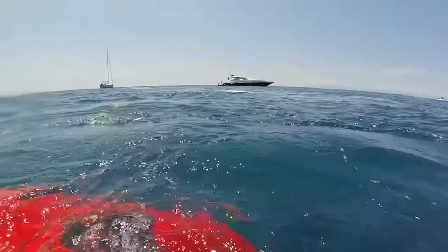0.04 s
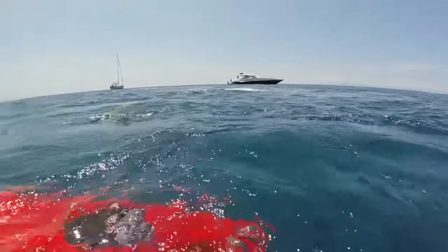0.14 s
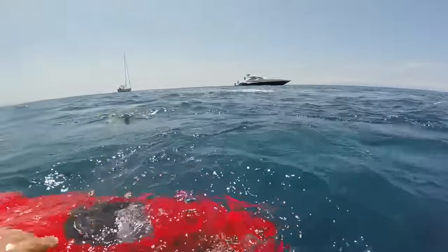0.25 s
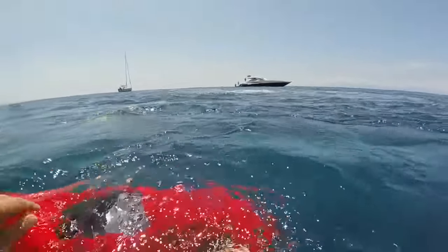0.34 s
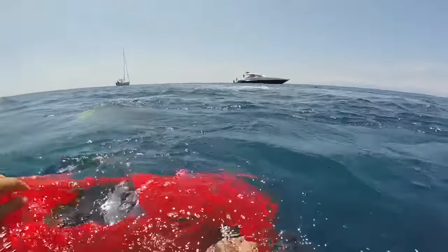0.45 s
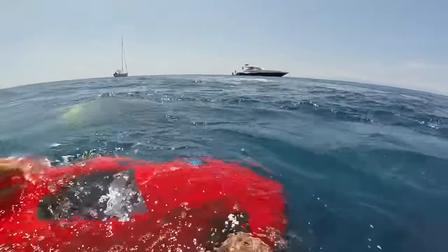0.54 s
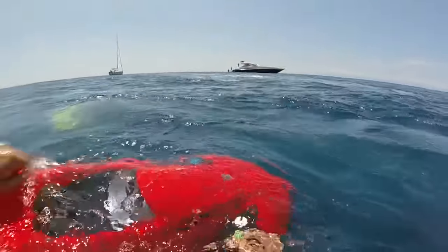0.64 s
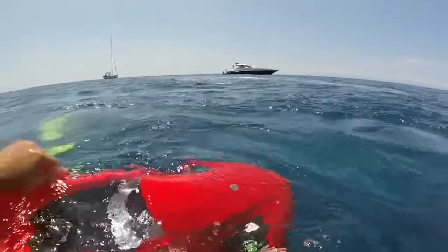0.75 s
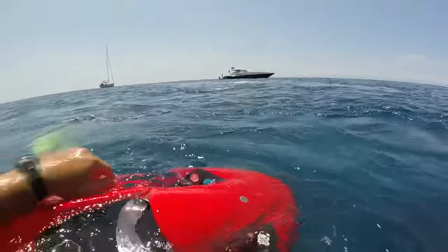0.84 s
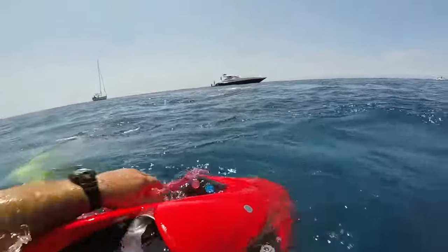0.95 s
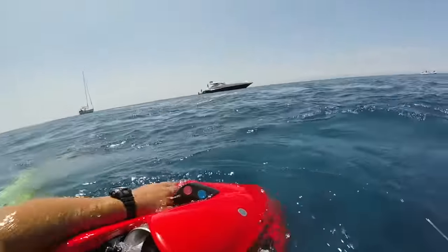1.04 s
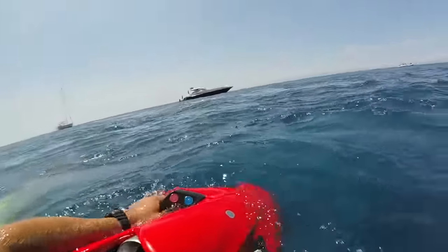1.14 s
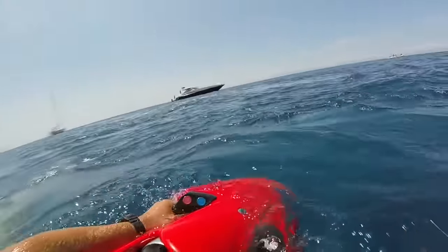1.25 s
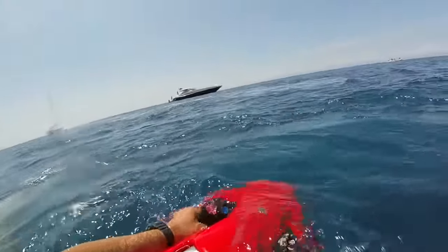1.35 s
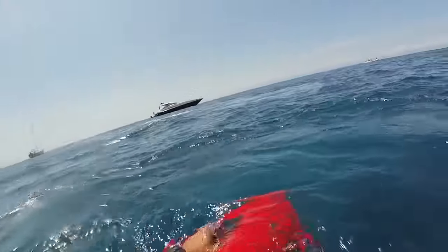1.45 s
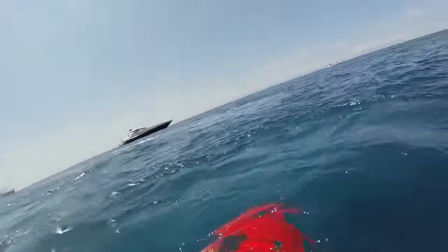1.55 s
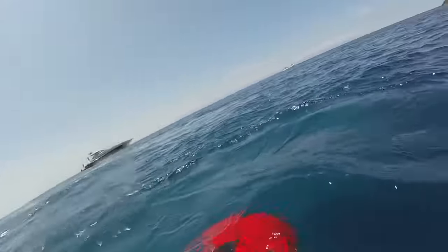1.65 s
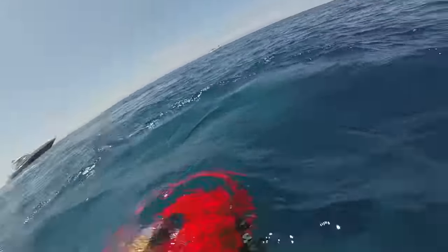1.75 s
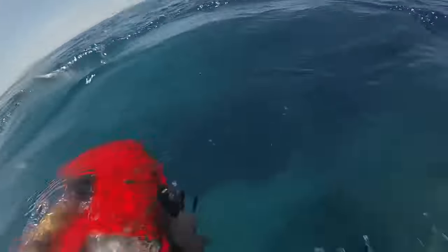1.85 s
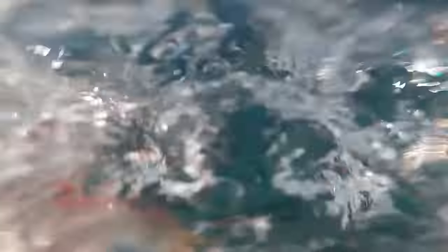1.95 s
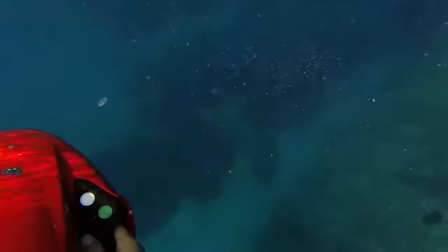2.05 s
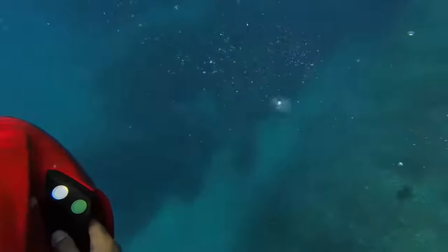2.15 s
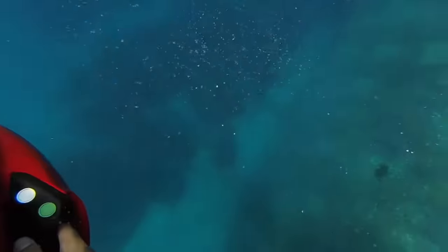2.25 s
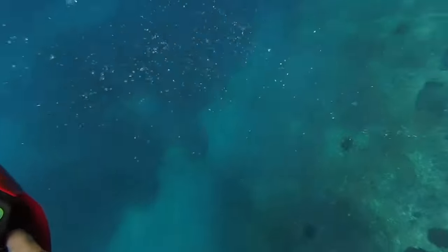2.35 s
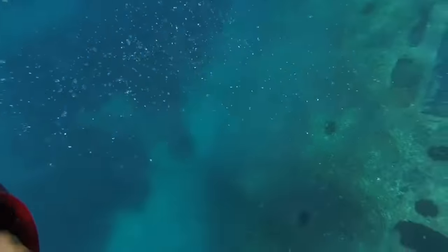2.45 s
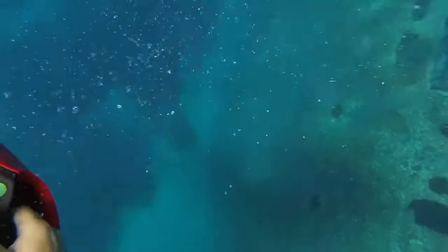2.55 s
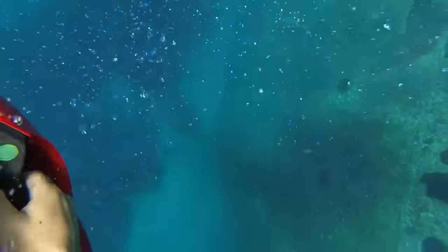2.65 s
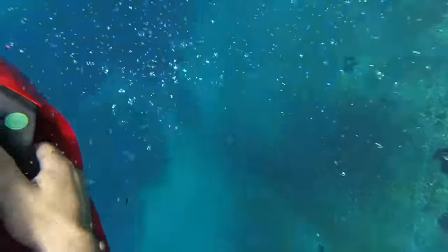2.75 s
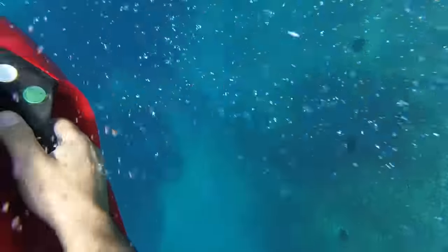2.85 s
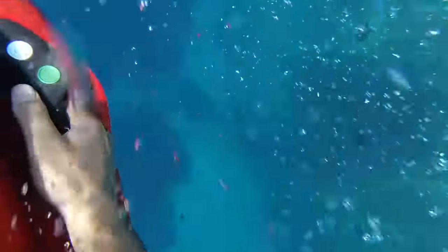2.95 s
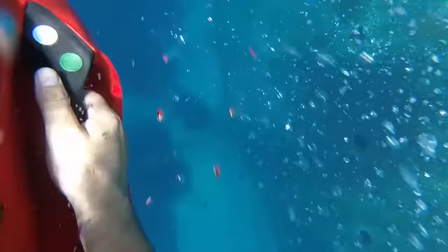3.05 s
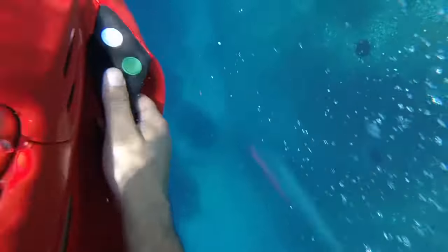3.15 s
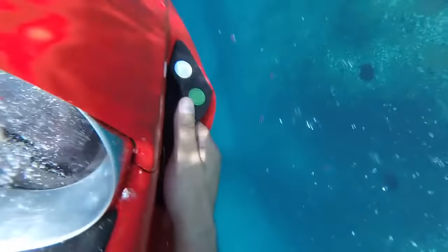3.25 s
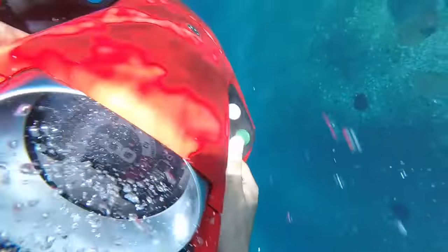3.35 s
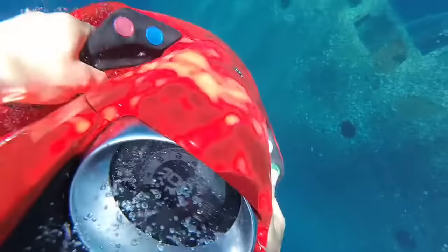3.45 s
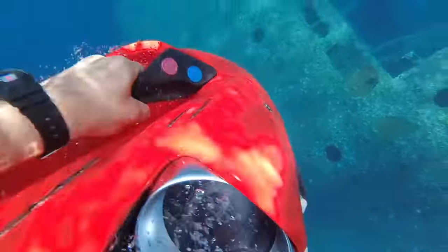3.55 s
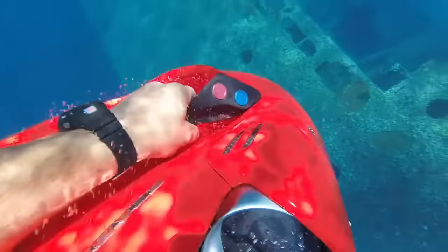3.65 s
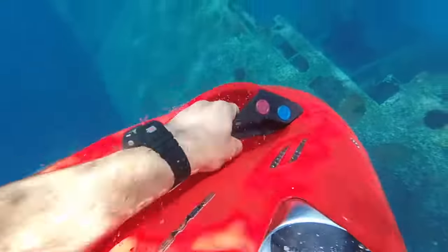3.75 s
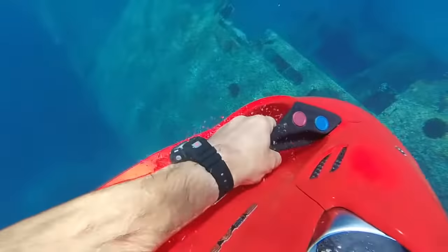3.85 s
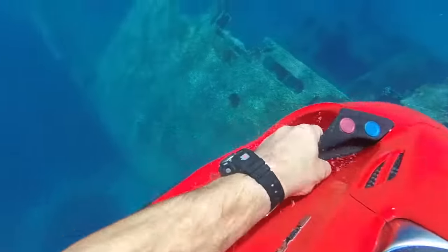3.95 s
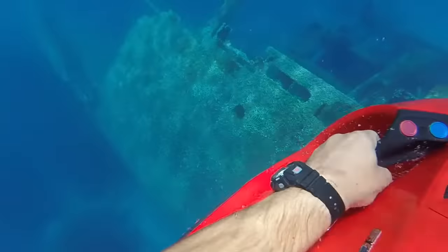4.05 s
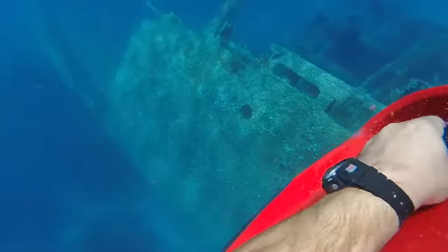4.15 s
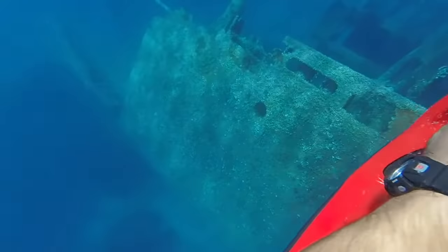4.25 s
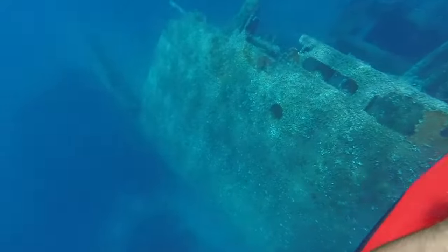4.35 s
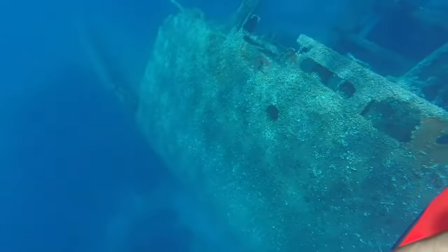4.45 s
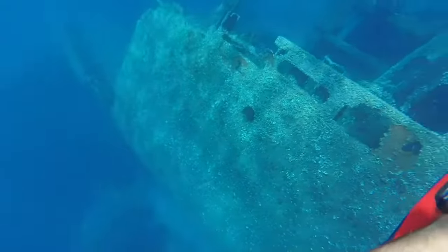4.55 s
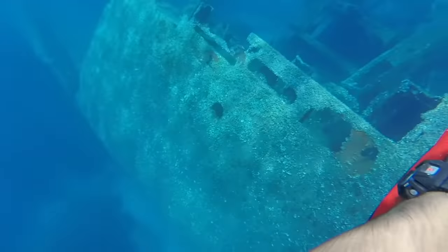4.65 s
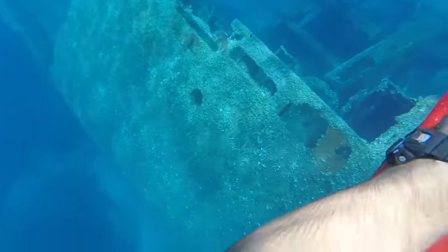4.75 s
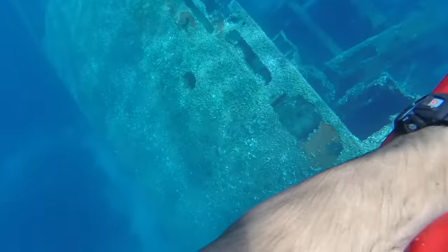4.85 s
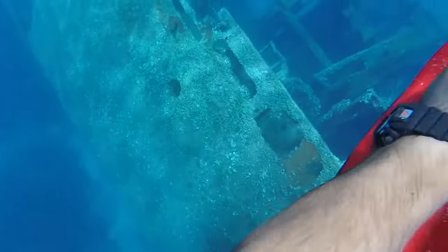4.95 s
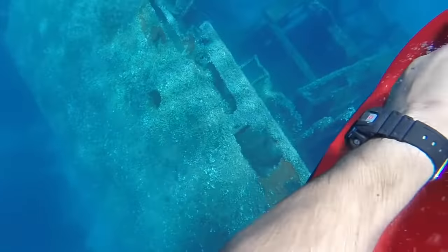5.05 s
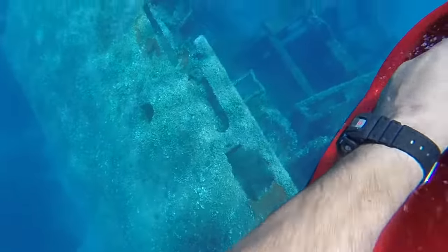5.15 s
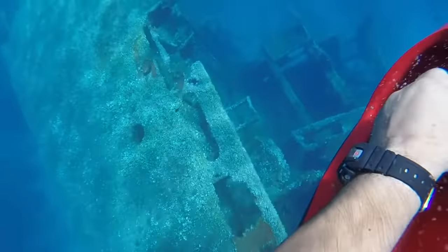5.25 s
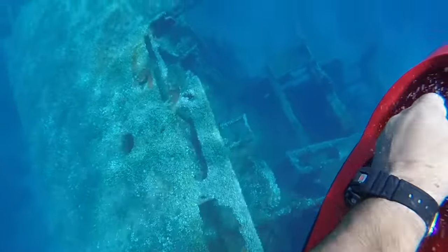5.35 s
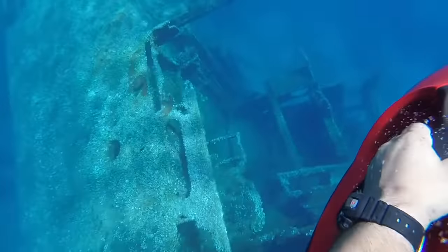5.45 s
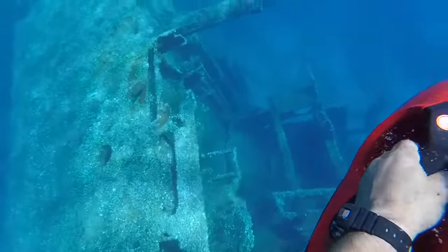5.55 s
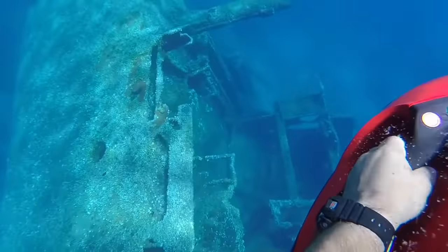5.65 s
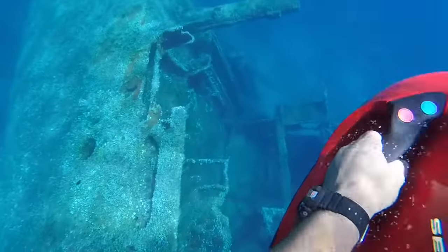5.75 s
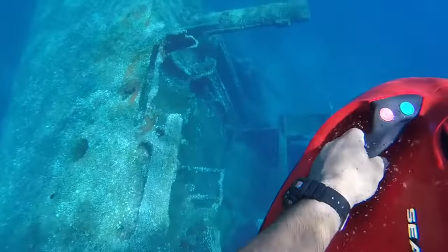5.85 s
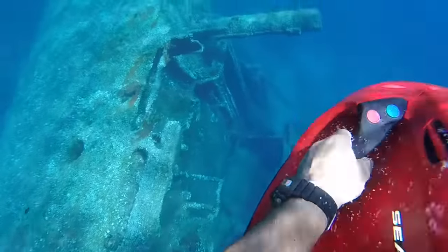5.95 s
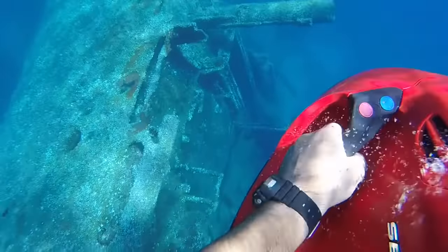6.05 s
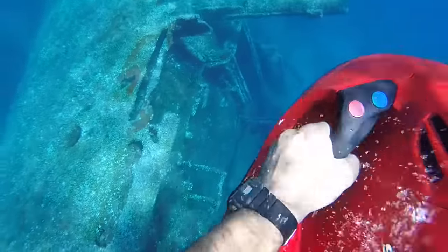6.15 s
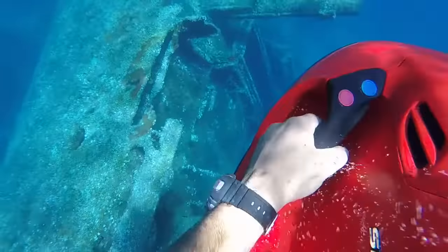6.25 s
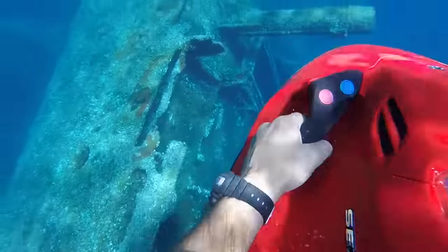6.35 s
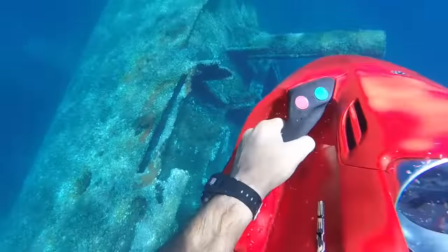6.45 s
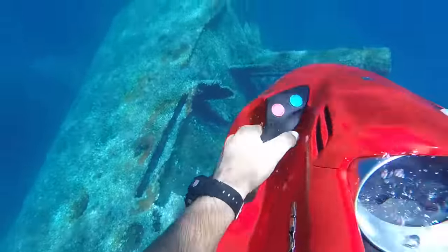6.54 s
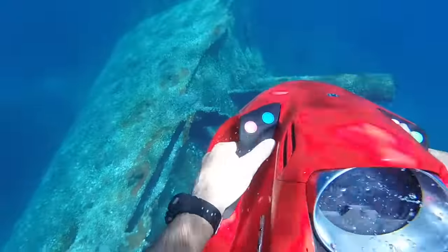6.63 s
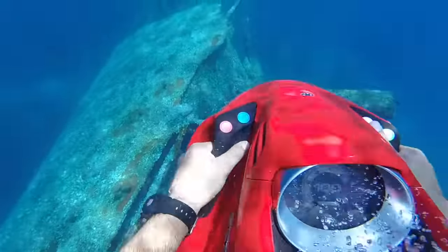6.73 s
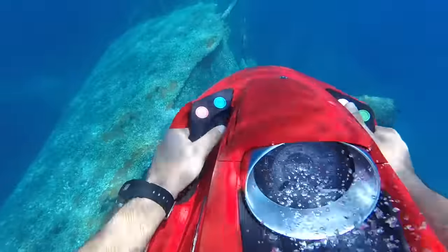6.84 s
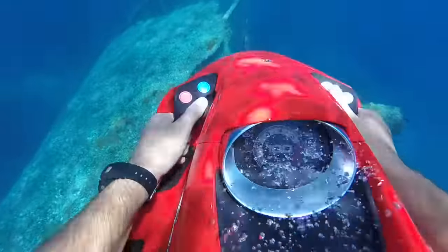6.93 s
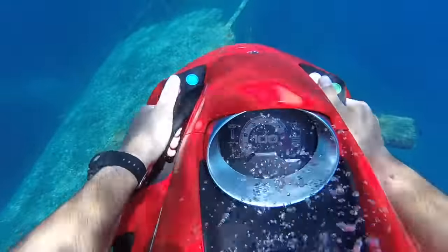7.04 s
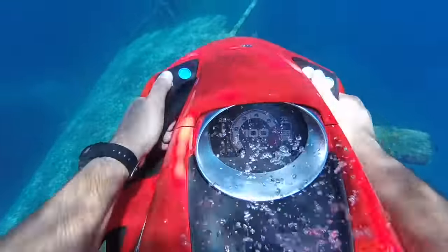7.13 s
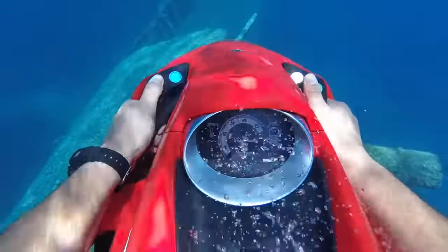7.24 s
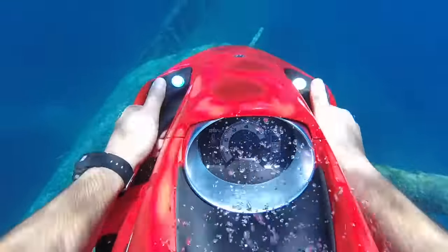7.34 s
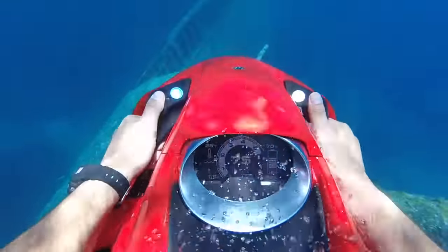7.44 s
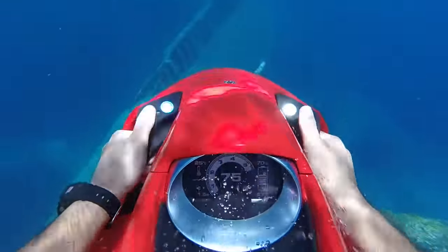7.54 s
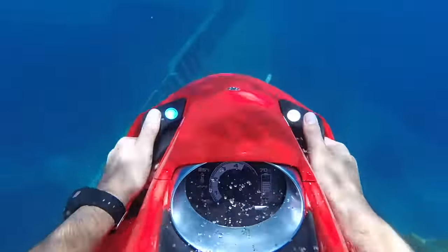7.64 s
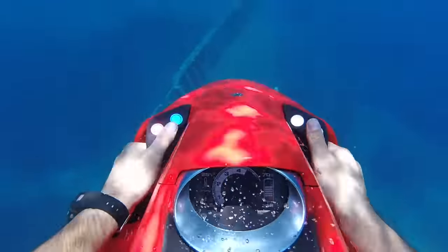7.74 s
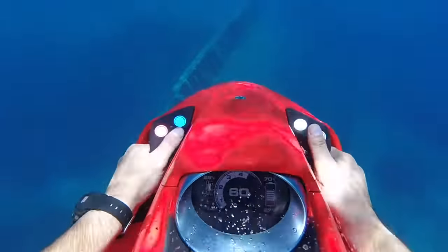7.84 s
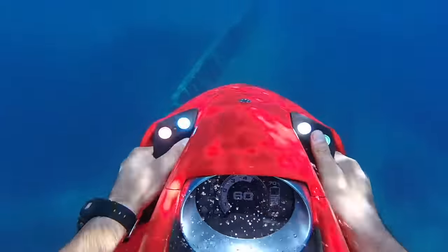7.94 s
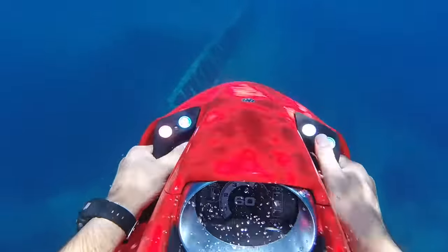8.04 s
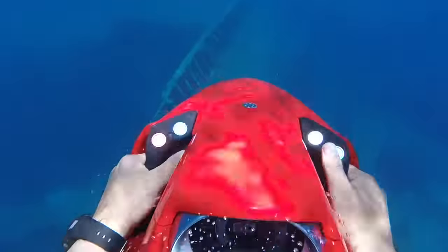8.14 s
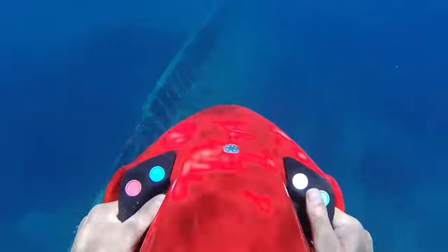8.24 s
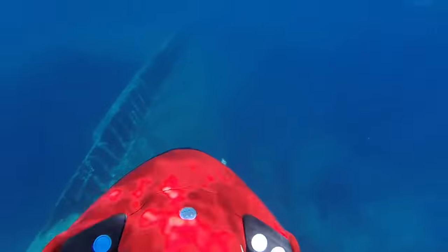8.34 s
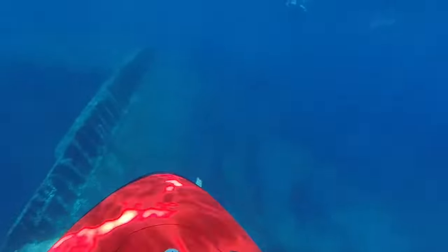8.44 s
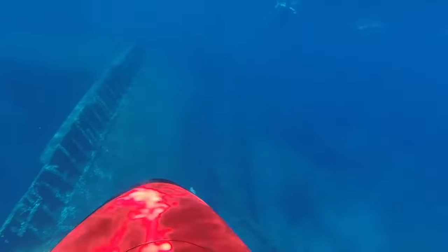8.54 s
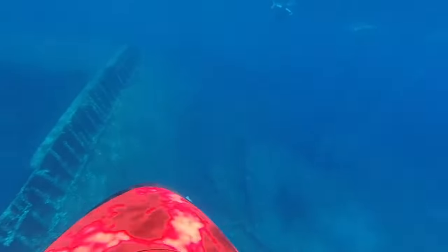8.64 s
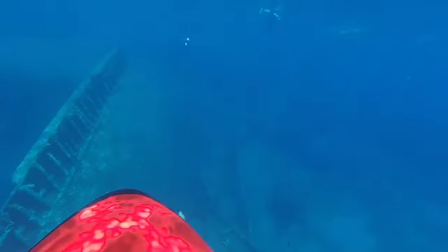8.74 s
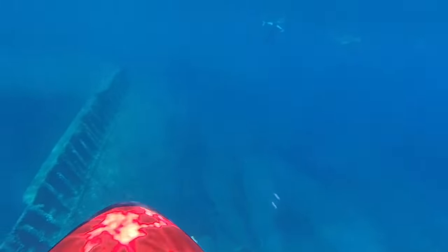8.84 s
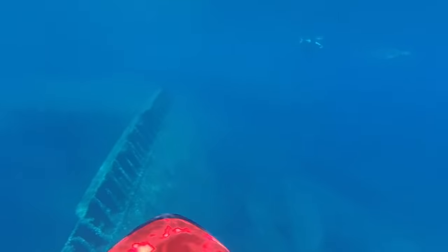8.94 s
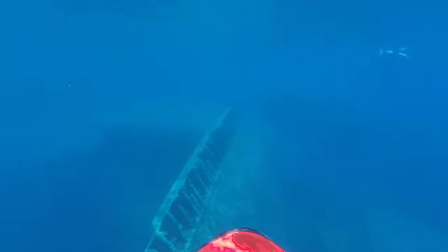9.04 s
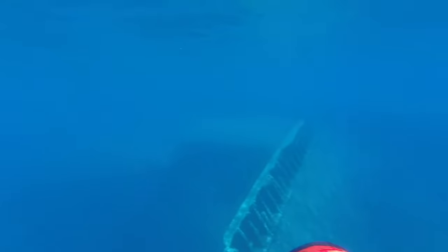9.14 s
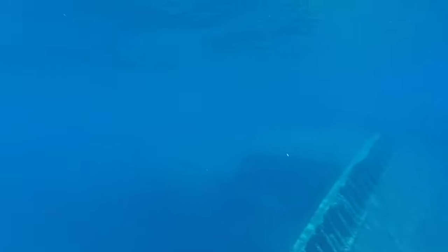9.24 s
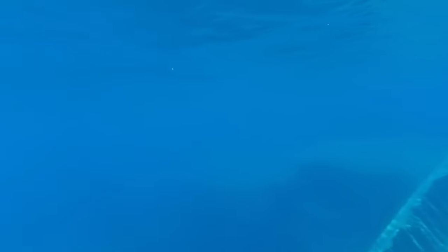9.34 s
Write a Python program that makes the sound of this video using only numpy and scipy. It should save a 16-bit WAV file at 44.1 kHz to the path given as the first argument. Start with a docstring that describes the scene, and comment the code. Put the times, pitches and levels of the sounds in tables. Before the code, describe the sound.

An underwater scooter dives from splashing surface into dull, close underwater sound: low motor hum and whine, bubbling surges, thumps, a slowdown and restart.

```python
"""At a choppy sea surface and then below it, an electric underwater scooter dives with a camera in a housing.
Spray, made of random impulses and ringing bubbles, fizzes until water closes over the microphone with a gulp.
Below, the three-bladed impeller hums as a blade tone with overtones of its shaft rate. Eddies, as filtered
impulses, buffet the housing, and bubbles rush, ring and tick past it as noise and decaying sines."""
import sys
import numpy as np
from scipy import signal
from scipy.fft import rfft, irfft, next_fast_len
from scipy.io import wavfile

SR = 44100
rng = np.random.default_rng(int(sys.argv[2]) if len(sys.argv) > 2 else 0)


def master_out(mix):
    """Clip the mix to full scale and print it as 16-bit PCM to the path in sys.argv[1]."""
    frames = np.transpose(np.atleast_2d(mix))
    ceiling = np.clip(frames, -1, 1)
    pcm = np.round(ceiling * 32767).astype(np.int16)
    wavfile.write(sys.argv[1], SR, pcm)


N = 414099
TIME = np.arange(N) / SR
EVENT_TIME = np.arange(SR * 3 // 4) / SR

# Impeller speed. Each row: time in seconds, mean blade-pass frequency in Hz.
SPEED = [(0, 71.5), (1.3, 92.6), (1.8, 111.2), (2.3, 118.4), (2.7, 120.1), (4.2, 120.4), (5.55, 121.7),
         (6.3, 101.6), (6.55, 104.6), (7.05, 110.4), (7.3, 108.6), (7.6, 99.5), (8.0, 99.75), (8.3, 81.32),
         (8.7, 66.2), (9.1, 86.2), (9.39, 93.4)]
# Rumble of wind, then of water. Each row: time in seconds, relative level in dB.
HEAVE = [(0, -43.5), (0.72, -35), (0.94, -41.5), (1.85, -30.5), (2.25, -47.5), (3.2, -60), (4.1, -43.5),
         (4.5, -49.5), (5.9, -39.5), (6.33, -46), (6.8, -29.5), (7.8, -35), (8.5, -36), (8.65, -48),
         (8.85, -27.5), (9.39, -38.5)]
# Spectrum of spray. Each row: frequency in Hz, relative density in dB per Hz.
SPRAY_SPECTRUM = [(2000, -9), (3400, -8.5), (4200, -6.5), (4900, 4), (5400, -6.5), (5900, -20),
                  (6500, -3.5), (7200, -10.5), (9200, -6.5), (9800, -23.5), (10400, -46), (14000, -55)]
# Spectrum of a tick through the housing wall. Each row: frequency in Hz, relative density in dB per Hz.
TICK_SPECTRUM = [(500, -11), (2500, 8.5), (5500, 0), (6500, 3.5), (7500, -4), (9500, -13.5), (14000, -44)]
# Surges of turbulent, bubbly water that hit the housing.
# Each row: start in seconds, length in seconds, relative level of eddies in dB, of bubbles in dB.
SURGES = [(2.11, 0.051, -26.5, -51), (2.35, 0.35, -46.5, -46.5), (3.69, 0.035, -34.5, -43),
          (3.95, 0.11, -28, -56), (4.07, 0.11, -22, -44.5), (4.22, 0.041, -20, -39), (4.88, 0.21, -27, -47),
          (5.54, 0.16, -21.5, -36), (5.75, 0.11, -23.5, -42), (5.9, 0.11, -18.5, -47),
          (6.05, 0.084, -24.5, -40.5), (6.45, 0.18, -36, -44), (6.635, 0.042, -18.5, -45.5),
          (6.83, 0.05, -20, -44.5), (6.9, 0.14, -23.5, -60), (7.43, 0.092, -22.5, -53),
          (8.03, 0.062, -26.5, -74), (8.41, 0.073, -22, -50.5), (8.51, 0.065, -22.5, -47.5),
          (8.77, 0.066, -38, -56), (9.25, 0.11, -25.5, -49.5)]
# a surge builds over this share of its length, then decays with this time constant (s)
SURGE_ATTACK_SHARE, SURGE_RELEASE_S = 0.063, 0.05
# the moment the water shuts the microphone port (s)
SHUT_S = 1.982


def amp(db):
    """Level to amplitude: 20 dB is a factor of ten."""
    return 10 ** (np.asarray(db) / 20)


def unit(x):
    """Normalises the mean power: the result has rms 1."""
    return x / np.sqrt(np.mean(x ** 2) + 1e-20)


def curves(rows):
    """Linear interpolation in time of each column of a table."""
    s, *columns = np.transpose(rows)
    return [np.interp(TIME, s, c) for c in columns]


def add(mix, s, sound):
    """Superposition: adds a sound to the mix, in place, at time s."""
    part = mix[max(round(s * SR), 0):][:len(sound)]
    part += sound[:len(part)]


def colour(x, spectrum):
    """Minimum-phase filter, which fixes the phase by the spectrum alone; the result has rms 1."""
    f, db = np.transpose(spectrum)
    log_hz = np.log(abs(np.fft.fftfreq(8192, 1 / SR)) + 1)
    log_gain = np.log(amp(np.interp(log_hz, np.log(f), db)))
    # the Hilbert transform of the log gain gives the phase
    response = np.exp(np.conj(signal.hilbert(log_gain)))
    taps = np.fft.ifft(response).real[:4096]
    return unit(signal.oaconvolve(x, taps)[:N])


def resonate(x, hz, width_hz):
    """A damped resonance that follows the pitch hz, fixed or moving; the result has rms 1."""
    turn = np.exp(2j * np.pi * np.cumsum(hz * np.ones(len(x))) / SR)
    r = np.exp(-np.pi * width_hz / SR)
    # shift the pitch to zero, low-pass, shift back
    lowered = signal.lfilter([1], [1, -2 * r, r * r], x / turn)
    return unit((turn * lowered).real)


def muffle(x, edge_hz, order=4):
    """Butterworth low-pass: attenuation grows with frequency above the edge."""
    return signal.sosfilt(signal.butter(order, edge_hz, fs=SR, output="sos"), x)


def drift(rate, step_count=64):
    """Slow random motion: noise under a Gaussian spectrum up to about rate in Hz, rms 1."""
    size = next_fast_len(N // step_count + 2)
    hz = np.fft.rfftfreq(size, step_count / SR)
    spectrum = rfft(rng.standard_normal(size)) * np.exp(-(hz / rate) ** 2)
    slow = irfft(spectrum, size)
    return unit(np.interp(np.arange(N) / step_count, np.arange(size), slow))


def impacts(per_s, spread_db):
    """Independent impulses at a mean rate, mostly small and a few large, of random sign."""
    size = amp(spread_db * np.minimum(rng.exponential(1, N), 4))
    return size * rng.choice([-1, 1], N) * (rng.random(N) < per_s / SR)


def envelope(length, attack_s, release_s):
    """Linear attack and hold, with exponential decay once the length is over."""
    attack = np.clip(EVENT_TIME / attack_s, 0, 1)
    return attack * np.exp(-np.clip((EVENT_TIME - length) / release_s, 0, 30))


def swells(rows, attack_share, release_s):
    """Incoherent events add in power, here for two level columns; longer events build more slowly."""
    powers = np.zeros((2, N))
    for start, length, *levels in rows:
        for power, db in zip(powers, levels):
            add(power, start, (amp(db) * envelope(length, attack_share * length, release_s)) ** 2)
    return powers


def bubble(hz, t60, rise=0.39):
    """A pulsating bubble is a damped oscillator; its pitch climbs as it decays 60 dB in t60 seconds."""
    t = np.arange(int(t60 * SR) + 2) / SR
    ring = np.sin(2 * np.pi * hz * (t + rise * t ** 2 / (2 * t60)))
    return ring * amp(-60 * t / t60) * (1 - np.exp(-4 * hz * t))


def cloud(low_hz, high_hz, per_s, cycles, spread_db, rise, count=28):
    """A swarm of bubbles of many sizes, each decaying over the same number of cycles; rms 1."""
    pitches = np.geomspace(low_hz, high_hz, count) * rng.uniform(.97, 1.03, count)
    hits, kind = impacts(per_s, spread_db), rng.integers(0, count, N)
    swarm = np.zeros(N)
    for k, hz in enumerate(pitches):
        rings = signal.oaconvolve(hits * (kind == k), bubble(hz, cycles / hz, rise))[:N]
        swarm += rings * np.sqrt(hz)  # offsets the shorter ring of small bubbles
    return unit(swarm)


def rumble(gain_db=5.0, surge_db=-12.5):
    """Turbulent pressure at low frequency: slow swings of wind and water, stronger in each surge."""
    # Each row: frequency in Hz, relative density in dB per Hz.
    swell_spectrum = [(10, -17.5), (25, -2.5), (45, 6), (80, -1), (120, -6.5), (200, -14.5), (500, -81.5)]
    eddy_power = swells(SURGES, SURGE_ATTACK_SHARE, SURGE_RELEASE_S)[0]
    level = np.sqrt(amp(curves(HEAVE)[0]) ** 2 + amp(surge_db) ** 2 * eddy_power)
    return colour(rng.standard_normal(N), swell_spectrum) * level * amp(gain_db)


def surface():
    """Impact noise and bubble resonance: slosh and spray grow with speed until a film seals the port."""
    # Spectrum of slosh. Each row: frequency in Hz, relative density in dB per Hz.
    slosh_spectrum = [(90, -21.5), (200, 3), (600, 4), (1000, -2.5), (1600, -4), (2800, -10.5),
                      (4000, -14.5), (6000, -42.5)]
    # Wavelets that break over the scooter.
    # Each row: start in seconds, length in seconds, relative level of slosh in dB, of spray in dB.
    splashes = [(0.79, 0.12, -42.5, -43.5), (1.06, 0.059, -41.5, -38), (1.17, 0.24, -42, -46.5),
                (1.46, 0.14, -37.5, -32), (1.853, 0.0047, -26.5, -37)]
    # Water film closing over the port. Each row: time in seconds, relative level of its squeal in dB.
    film_levels = [(1.82, -63), (1.86, -29), (1.91, -43), (1.945, -31), (1.975, -27.5), (1.985, -71),
                   (2.025, -46.5), (2.06, -59)]

    # wash: levels (dB) at the reference blade-pass frequency (Hz), growth with speed (dB per dB)
    wash_hz, wash_slosh_db, wash_spray_db = 99.1, -40, -48
    slosh_growth, spray_growth = 4.96, 2.46
    speed_db = 20 * np.log10(curves(SPEED)[0] / wash_hz)
    slosh_power, spray_power = swells(splashes, attack_share=0.5, release_s=0.069)
    slosh_level = np.sqrt(slosh_power + amp(wash_slosh_db + slosh_growth * speed_db) ** 2)
    spray_level = np.sqrt(spray_power + amp(wash_spray_db + spray_growth * speed_db) ** 2)

    # the film starts to cover the port (s); the surface dies away (dB per s), all but a little slosh (dB)
    cover_s, cover_db_per_s, covered_slosh_db = 1.882, 1006, -8.5
    cover_db = -cover_db_per_s * np.clip(TIME - cover_s, 0, .1)
    splashing_db = 1.6 * drift(45)

    chirps = cloud(low_hz=417, high_hz=2300, per_s=150, cycles=28, spread_db=4, rise=0.15)
    lapping = colour(impacts(per_s=1700, spread_db=0.5), slosh_spectrum)
    slosh = (0.76 * lapping + 0.5 * chirps) * slosh_level
    slosh *= amp(splashing_db + np.maximum(cover_db, covered_slosh_db))

    droplets = cloud(low_hz=2200, high_hz=5100, per_s=160, cycles=36, spread_db=4.5, rise=0.05)
    patter = unit(impacts(per_s=2500, spread_db=5.5))
    mist = colour(patter + 0.69 * rng.standard_normal(N), SPRAY_SPECTRUM)
    spray = unit(mist + .5 * droplets) * spray_level * amp(splashing_db + cover_db)

    leak = impacts(per_s=1300, spread_db=4.5)
    squeal = resonate(leak, hz=6430, width_hz=320) + 0.95 * resonate(leak, hz=5320, width_hz=1200)
    film = muffle(squeal, 7600, order=8) * amp(curves(film_levels)[0] - 6.0)
    film *= (TIME > film_levels[0][0]) * (TIME < film_levels[-1][0])
    return (slosh + spray) * (TIME < SHUT_S) + film


def drops(drop_t60=0.011, splat=0.78, splat_s=0.0019):
    """Impact noise, then bubble resonance: drops of spray splat on the housing and ring briefly."""
    # Each row: start in seconds, relative level in dB, initial pitch in Hz.
    drop_rows = [(0.438, -31, 4970), (0.633, -32, 4970), (0.679, -30, 4570), (0.900, -18.5, 2300),
                 (1.070, -21.5, 4000), (1.112, -24, 4330), (1.185, -16.5, 5000), (1.293, -23, 4960),
                 (1.859, -18, 4650), (1.939, -14, 5700)]
    out, t = np.zeros(N), np.arange(SR // 20) / SR
    patter = colour(signal.unit_impulse(N), SPRAY_SPECTRUM)[:len(t)]
    for s, db, hz in drop_rows:
        spatter = signal.fftconvolve(rng.standard_normal(len(t)) * np.exp(-t / splat_s), patter)
        add(out, s, amp(db) * splat * spatter / abs(spatter).max())
        add(out, s, amp(db) * bubble(hz, drop_t60))
    return muffle(out, 9000, order=8)


def flow():
    """Turbulence and bubble resonance: surges swell eddies and fine bubbles, and churn up larger ones."""
    # Spectrum of eddies. Each row: frequency in Hz, relative density in dB per Hz.
    eddy_spectrum = [(30, -30), (70, -1), (110, 3.5), (200, 1), (330, -5.5), (500, -12.5), (800, -18.5),
                     (1300, -27.5), (2500, -60), (4000, -83.5)]
    # Spectrum of the bubbles' rush. Each row: frequency in Hz, relative density in dB per Hz.
    rush_spectrum = [(200, -18), (500, 18), (900, 6.5), (1300, 7.5), (2100, 5.5), (2800, -5.5), (3300, -13),
                     (4000, -38), (6500, -34.5), (8000, -36.5), (10000, -49.5), (14000, -61)]
    # Stream of fine bubbles that sweeps past. Each row: time in seconds, relative level in dB.
    stream_levels = [(2.1, -54), (3.0, -48.5), (3.9, -43.5), (4.9, -37), (6.0, -33), (6.25, -49),
                     (6.9, -45.5), (7.7, -51), (8.3, -61), (8.68, -51), (8.85, -49.5), (9.17, -52.5),
                     (9.39, -51)]
    # Fineness of that stream. Each row: time in seconds, gain of its smallest bubbles in dB.
    fineness = [(2.3, 5.5), (2.6, 4.5), (3.3, -4.5), (4.0, -2), (4.7, 0.5), (5.8, -3.5), (6.6, 4.5),
                (7.3, -0.5), (8.2, 15.5), (8.7, 1), (9.3, 13)]

    stream_db = curves(stream_levels)[0]
    # steady eddies grow with the rumble and with the stream (dB per dB)
    eddy_db = 10 + 0.44 * curves(HEAVE)[0] + 0.49 * stream_db
    eddy_power, bubble_power = swells(SURGES, SURGE_ATTACK_SHARE, SURGE_RELEASE_S)
    gusts = drift(66)
    eddies = colour(impacts(per_s=1200, spread_db=3.0), eddy_spectrum)
    eddies *= np.sqrt(amp(eddy_db) ** 2 + eddy_power) * amp(1.2 * gusts)

    fine_hits = unit(impacts(per_s=2500, spread_db=1.0))
    fizz = colour(fine_hits + 0.39 * rng.standard_normal(N), rush_spectrum)
    gurgle = cloud(low_hz=700, high_hz=2750, per_s=1300, cycles=19, spread_db=2.6, rise=0.08)
    pops = colour(impacts(per_s=380, spread_db=4.2), TICK_SPECTRUM)
    stream = fizz + 0.58 * muffle(gurgle, 3200) + amp(-29.5) * pops
    coarse = muffle(stream, 3700, order=1)
    rush = coarse + (stream - coarse) * amp(curves(fineness)[0])
    rush *= np.sqrt(amp(stream_db) ** 2 + bubble_power) * amp(1.9 * gusts)

    large = cloud(low_hz=400, high_hz=2400, per_s=480, cycles=11, spread_db=3.3, rise=.1)
    clumps = unit(muffle(large, 2800) * amp(2.5 * gusts))
    churn = clumps * np.sqrt(bubble_power)
    return (eddies + rush + churn) * (TIME > SHUT_S)


def sliding_tones(width_share=0.2, wobble=0.054):
    """Noise through a resonance of moving pitch gives a breathy tone that slides, here in fits."""
    # Sliding tones: a hiss of spray at 0.8 s, air pockets and bubbles ringing,
    # and at 8.7-8.9 s the motor slowing and restarting. Each row:
    # start in seconds, length in seconds, first and last pitch in Hz before wobble, relative level in dB.
    tone_rows = [(0.8, 0.15, 4630, 3900, -51.5), (2.11, 0.27, 1220, 1475, -42),
                 (2.16, 0.036, 320, 254, -35.5), (2.345, 0.12, 604, 833, -42.5),
                 (2.545, 0.12, 372, 590, -43), (8.673, 0.094, 422.1, 385, -41),
                 (8.687, 0.071, 284.8, 163, -32), (8.775, 0.062, 565, 653, -33.5),
                 (8.788, 0.059, 416, 294, -30), (9.255, 0.094, 784, 870, -31)]
    out = np.zeros(N)
    waver, fits = 1 + wobble * drift(45), unit(amp(3.2 * drift(55)))
    for start, length, first_hz, last_hz, db in tone_rows:
        level = envelope(length, attack_s=0.012, release_s=0.025)
        hz = np.interp(EVENT_TIME, [0, length], [first_hz, last_hz]) * waver[:len(level)]
        slide = resonate(rng.standard_normal(len(level)), hz, width_share * first_hz) * level
        # give the tone the energy of its envelope
        add(out, start, amp(db) * slide * np.linalg.norm(level) / np.linalg.norm(slide))
    return out * fits


def flurries(scatter=0.15, cycles=26):
    """Bubble resonance in quick, uneven succession, each bubble near the gliding pitch of its flurry."""
    # Each row: start in seconds, length in seconds, first and last central pitch in Hz, relative level in dB.
    flurry_rows = [(0.242, 0.068, 960, 700, -49.5), (0.353, 0.064, 1580, 1310, -50.5),
                   (0.44, 0.016, 5100, 3450, -42.5), (0.441, 0.061, 2330, 1740, -49.5),
                   (1.062, 0.05, 905, 1680, -38.5), (1.513, 0.1, 1320, 2800, -33.5),
                   (1.588, 0.11, 970, 660, -34), (1.841, 0.027, 430, 614, -34),
                   (2.368, 0.155, 1550, 1840, -43.5), (2.594, 0.071, 2120, 2500, -47),
                   (3.702, 0.055, 1560, 2170, -39), (5.943, 0.074, 816, 1930, -34),
                   (6.589, 0.046, 2220, 1830, -41), (6.639, 0.046, 1100, 680, -37),
                   (8.799, 0.1, 1950, 1880, -51.5), (9.245, 0.1, 2250, 1680, -44.5)]
    out = np.zeros(N)
    for start, length, first_hz, last_hz, db in flurry_rows:
        flurry = np.zeros(len(EVENT_TIME))
        count = round(6 + 110 * length)
        places = (np.arange(count) + rng.random(count)) / count
        for place, (detune, size) in zip(places, rng.standard_normal((count, 2))):
            hz = first_hz * (last_hz / first_hz) ** place * np.exp(scatter * detune)
            add(flurry, place * length, amp(3.5 * size) * bubble(hz, cycles / hz))
        flurry = muffle(flurry, min(1.4 * max(first_hz, last_hz), SR / 3))
        # the level is the rms over the flurry's length
        add(out, start, amp(db) * flurry * np.sqrt(length * SR) / np.linalg.norm(flurry))
    return out


def strikes(tick_db=-1):
    """Transients above the flow: damped single bubbles, pressure pulses and bursts of noise."""
    # Single bubbles.
    # Each row: start in seconds, relative level in dB, initial pitch in Hz, 60 dB decay time in seconds.
    bubble_rows = [(0.869, -28, 1260, 0.045), (0.899, -29, 1090, 0.017), (1.111, -24, 2330, 0.0099),
                   (1.148, -22, 485, 0.049), (1.622, -20, 633, 0.055), (2.034, -1.5, 1170, 0.0028),
                   (2.038, -6, 890, 0.045), (2.041, -18, 2500, 0.016), (2.046, -4, 863, 0.016),
                   (2.058, 0.5, 950, 0.0052), (2.2095, -7, 400, 0.055), (2.221, -15, 1240, 0.02),
                   (2.307, -14, 1230, 0.0086), (3.102, -22, 1585, 0.024), (3.142, -22.5, 1942, 0.015),
                   (3.146, -21, 2370, 0.012), (3.797, -23.5, 1830, 0.023), (3.817, -23, 2170, 0.026),
                   (3.958, -23.5, 910, 0.018), (4.165, -22, 890, 0.0096), (4.306, -25, 905, 0.009),
                   (5.952, -15, 554, 0.02), (6.148, -25, 2270, 0.027), (6.646, -20.5, 1455, 0.014),
                   (6.861, -21.5, 1390, 0.0094), (6.926, -24, 1480, 0.02), (6.978, -18.5, 710, 0.017),
                   (7.021, -24, 1320, 0.011), (8.851, -27, 1800, 0.0085), (8.938, -19, 1480, 0.0069),
                   (9.075, -30, 2697, 0.007), (9.212, -28.5, 2265, 0.01), (9.234, -22, 1840, 0.028),
                   (9.291, -31.5, 2170, 0.056)]
    # Large eddies and air pockets that strike the housing.
    # Each row: centre in seconds, relative peak level in dB, pitch in Hz.
    thump_rows = [(1.109, -19, 55.7), (1.971, -22, 128), (2.035, -12, 195), (2.133, -11, 187),
                  (2.143, -17, 247), (4.117, -12, 163), (4.247, -11.5, 261), (4.309, -11.5, 236),
                  (5.681, -12.5, 208), (6.65, -11, 263), (6.938, -11.5, 200), (7.024, -13, 218),
                  (7.482, -10.5, 194), (9.188, -8.5, 364)]
    # Small bubbles that burst on the housing. Each row: start in seconds, relative peak level in dB.
    tick_rows = [(2.036, -21), (2.045, -22), (2.208, -36.5), (4.154, -42), (4.246, -39.5), (5.626, -32.5),
                 (6.452, -37.5), (6.765, -38), (6.78, -35), (6.847, -40.5), (8.308, -45), (8.534, -40),
                 (8.759, -32), (9.339, -37)]

    bubbles, knocks, t = np.zeros(N), np.zeros(N), np.arange(SR // 12) / SR
    for s, db, hz, t60 in bubble_rows:
        # each bubble tears off with a ragged burst around its own pitch as it rings
        tear = rng.standard_normal(len(t)) * amp(-60 * t / t60)
        burst = resonate(tear, hz, width_hz=0.85 * hz)
        add(bubbles, s, amp(db) * .35 * burst / abs(burst).max())
        add(bubbles, s, amp(db) * bubble(hz, t60, rise=0.22))
    for s, db, hz in thump_rows:
        # a push, then a pull, as the pocket passes
        u = 2 * np.pi * hz * (t - t.mean())
        add(knocks, s - t.mean(), -amp(db) * u * np.exp((1 - u ** 2) / 2))
    tick = colour(signal.unit_impulse(N), TICK_SPECTRUM)[:len(t)]
    for s, db in tick_rows:
        crackle = signal.fftconvolve(rng.standard_normal(len(t)) * np.exp(-t / 0.0024), tick)
        add(knocks, s, amp(db + tick_db) * crackle / abs(crackle).max())
    # the housing wall keeps out the treble of whatever does not touch it
    return muffle(bubbles, 3000) + knocks


def housing_hiss():
    """Broadband noise excites a resonance: a faint hiss of the housing near 6.4 kHz."""
    # Each row: time in seconds, relative level in dB.
    hiss_levels = [(2.1, -86), (8.0, -87.5), (8.9, -70.5)]
    return resonate(rng.standard_normal(N), hz=6430, width_hz=850) * amp(curves(hiss_levels)[0])


def impeller(blades=3):
    """Periodic blade loading gives a tone and shaft-rate overtones; uneven inflow flutters the high most."""
    # Overtones of the drive. Each row: multiple of the shaft rate, relative level in dB.
    orders = [(6, 5.5), (9, -2.5), (10, -1.5), (12, -3.5), (15, -5.5), (18, -11), (21, -11.5), (24, -13.5),
              (27, -22), (30, -22)]
    # How the hull passes the overtones on. Each row: frequency in Hz, gain in dB.
    hull = [(170, -7.5), (240, -1), (270, -8), (325, 3), (380, -1), (440, 1.5), (505, -2), (550, 3.5),
            (620, 1.5), (800, -2), (970, 3)]
    # Blade tone at the housing. Each row: time in seconds, relative level in dB.
    hum_levels = [(1.3, -52), (1.55, -28.5), (1.9, -39.5), (2.6, -32.5), (2.82, -23.5), (3.45, -16.5),
                  (4.0, -17), (4.5, -25.5), (5.55, -19), (5.7, -39.5), (7.15, -30.5), (7.4, -21.5),
                  (8.0, -22.5), (8.1, -40), (8.7, -47), (9.03, -13.5), (9.39, -20)]
    # Overtones at the housing. Each row: time in seconds, relative level in dB.
    whine_levels = [(1.05, -51), (1.55, -33.5), (1.9, -48.5), (2.65, -39), (2.85, -40), (3.3, -32),
                    (4.4, -36.5), (5.1, -30), (6.3, -39.5), (7.2, -32), (8.0, -33), (8.25, -60),
                    (8.75, -34), (9.0, -26), (9.39, -25)]

    shaft_hz = curves(SPEED)[0] * (1 + .002 * drift(11.14)) / blades
    angle = 2 * np.pi * np.cumsum(shaft_hz) / SR
    tone = np.sqrt(2) * np.sin(blades * angle) * amp(curves(hum_levels)[0] + .5 * drift(16))
    overtones = np.zeros(N)
    for k, db in orders:
        hull_db = np.interp(k * shaft_hz, *np.transpose(hull))
        level_db = db + hull_db + 0.69 * np.sqrt(k) * drift(6.6)
        phase = rng.uniform(0, 2 * np.pi) + .036 * k * drift(34)
        overtones += amp(level_db) * np.sin(k * angle + phase)
    return tone + unit(overtones) * amp(curves(whine_levels)[0])


def scene():
    """Superposition of all sources at the one microphone, some of them through its port."""
    # a plug of air seals the port for a moment as the camera goes under
    port = np.interp(TIME, [SHUT_S - .005, SHUT_S, 2.09, 2.12], [0.52, 0.085, 0.13, 0.84])
    through_port = port * (rumble() + flow() + housing_hiss() + impeller())
    return (through_port + surface() + drops() + sliding_tones() + flurries() + strikes())[None]


def record(dry):
    """Band limit of the camera: a linear-phase low-pass with its edge at 13.9 kHz."""
    taps = signal.firwin(511, 13900, window=("kaiser", 9), fs=SR)
    return signal.oaconvolve(dry, taps[None], "same")


dry = scene()
out = record(dry)
master_out(out)
```